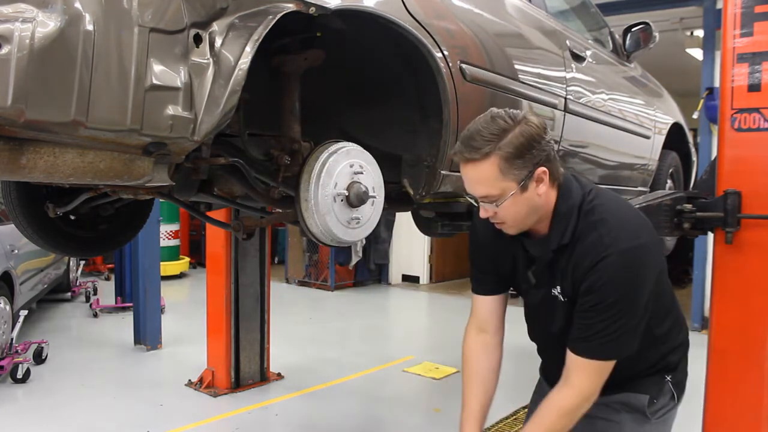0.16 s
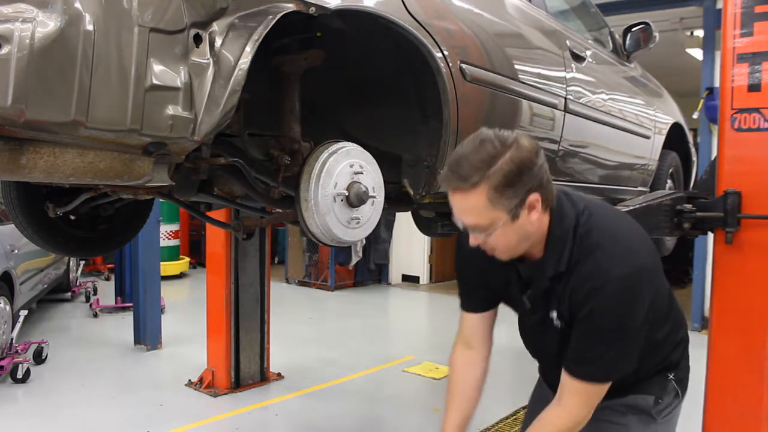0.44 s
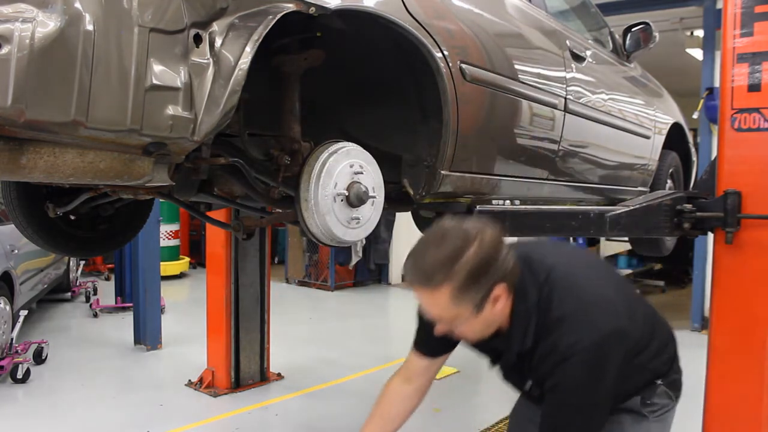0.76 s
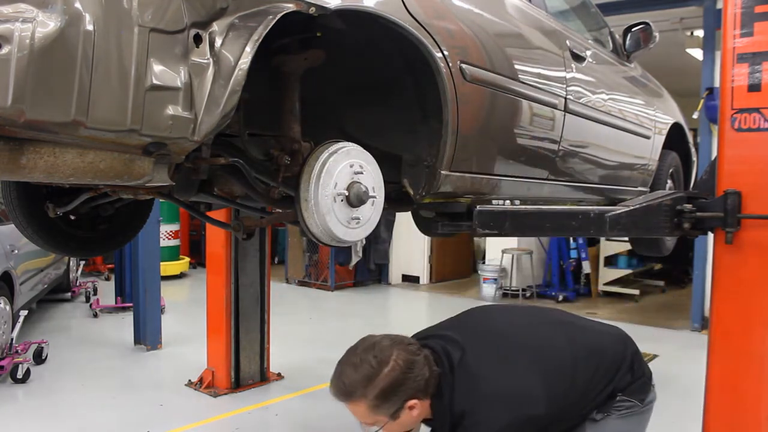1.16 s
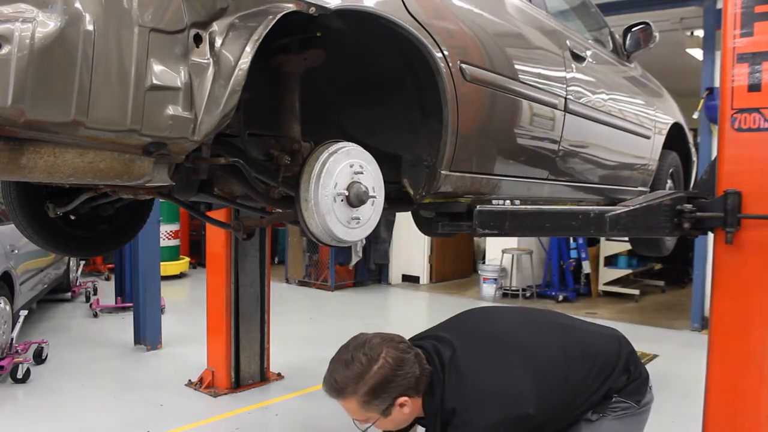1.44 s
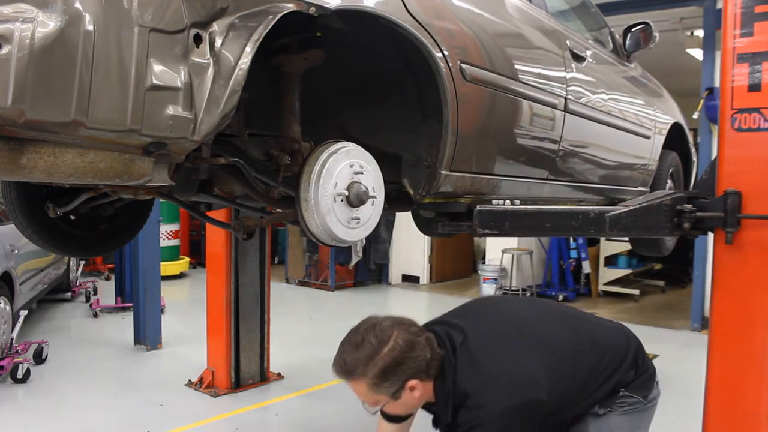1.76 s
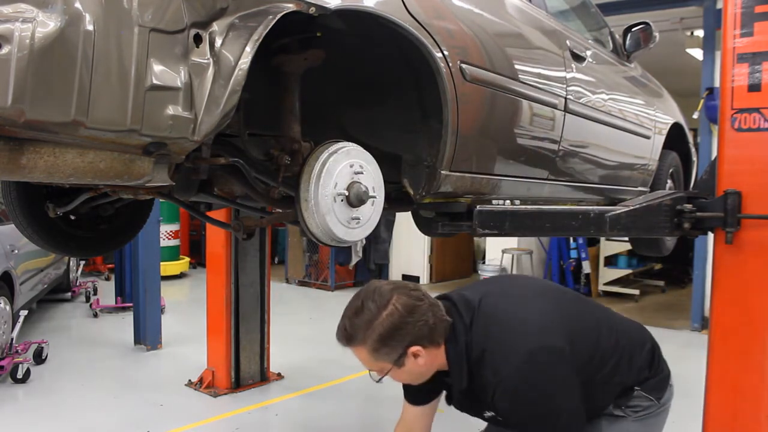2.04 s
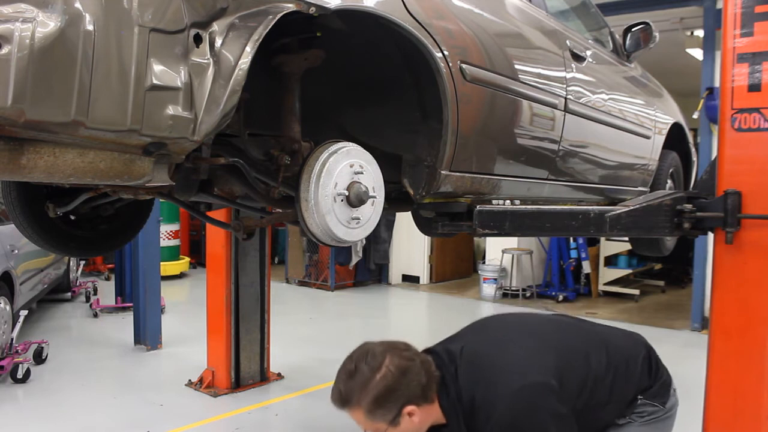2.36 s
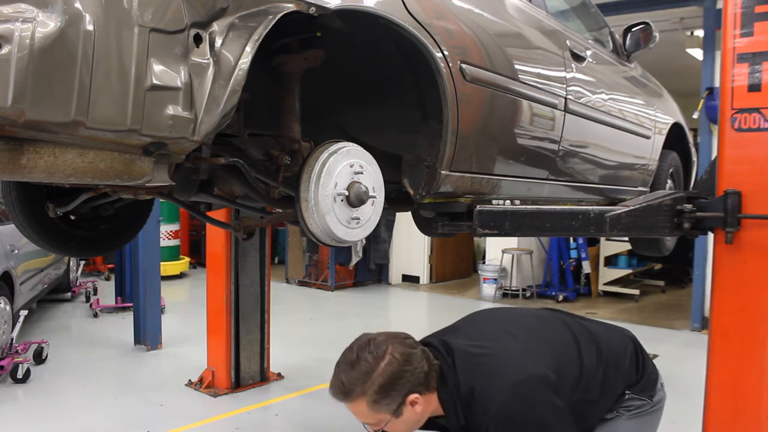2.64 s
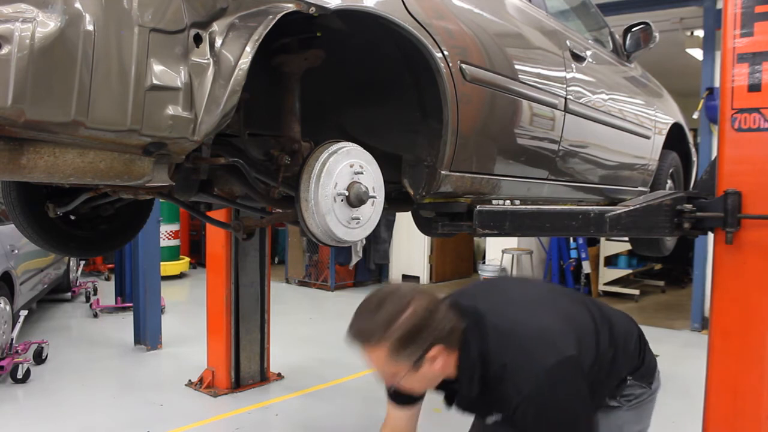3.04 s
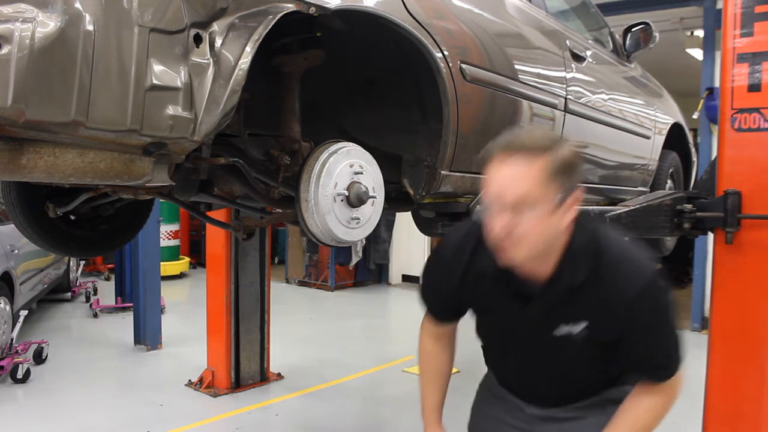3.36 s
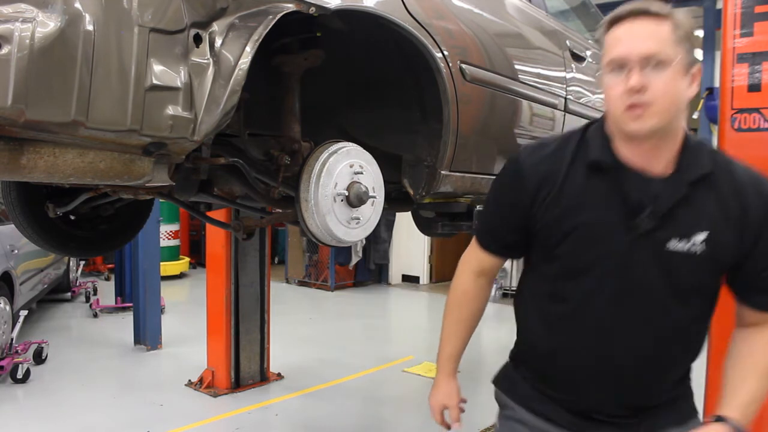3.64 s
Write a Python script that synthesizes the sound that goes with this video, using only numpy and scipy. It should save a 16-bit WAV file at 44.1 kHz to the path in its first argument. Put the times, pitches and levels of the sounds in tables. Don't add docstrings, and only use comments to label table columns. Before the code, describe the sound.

A heavy tyred steel wheel is handled on concrete over low fan hum and airy ventilation. Faint shoe and cloth scuffs and grit ticks lead to soft rolling knocks at 0.75-1.5 s, then firmer rubbery clunks at 1.55-1.9 s. A faint knock comes at 2.4 s. At 2.8 s it slams flat, by far loudest, bouncing at 2.9 and 3.03 s, settling by 3.3 s with sparse room echoes.

```python
import sys
import numpy as np
from scipy import signal
from scipy.fft import rfft, irfft
from scipy.io import wavfile
from scipy.ndimage import uniform_filter1d

SR = 44100
rng = np.random.default_rng(int(sys.argv[2]) if len(sys.argv) > 2 else 0)


def bounce(signal):
    frames = np.transpose(np.atleast_2d(signal))
    limited = np.clip(frames, -1, 1)
    pcm = np.round(limited * 32767).astype(np.int16)
    wavfile.write(sys.argv[1], SR, pcm)


def convert_level_to_amplitude(level_db):
    exponent = np.asarray(level_db, float) / 20
    return 10 ** exponent


N = 167580

# pitch_hz, level_db, t60_s
CLANK = [(583.5, -9, 0.038), (1200, -11.5, 0.029), (1319.6, -10.5, 0.024), (1530, -22.5, 0.035)]
THUD_RISE_S = 0.0015


def read(points, hz):
    point_hz, value = np.transpose(points)
    return np.interp(np.log(hz + 1), np.log(point_hz + 1), value)


def evened(x):
    return x / np.sqrt(np.mean(x ** 2) + 1e-20)


def add(mix, start_s, sound):
    at = round(start_s * SR)
    sound = sound[max(-at, 0):]
    part = mix[max(at, 0):][:len(sound)]
    part += sound[:len(part)]


def noise(size, colour_db):
    hz = np.fft.rfftfreq(size, 1 / SR) + 1
    spectrum = rfft(rng.standard_normal(size)) * convert_level_to_amplitude(colour_db(hz))
    return evened(irfft(spectrum, size))


def band(x, order, edge_hz, kind):
    return signal.sosfilt(signal.butter(order, edge_hz, kind, fs=SR, output="sos"), x)


def ring(t, hz, db, t60_s, rise_s):
    return convert_level_to_amplitude(db - 60 * t / t60_s) * (1 - np.exp(-t / rise_s)) * np.sin(2 * np.pi * hz * t)


def air():
    # freq_hz, level_db per Hz
    wash_colour = [(35, -14), (70, -2), (130, 0), (300, -8), (640, -15), (2200, -28), (4000, -26.5),
                   (15500, -45.5)]
    # pitch_hz, width_hz, level_db
    fan_tones = [(80, 14, -75), (120, 5.8, -71.5), (292, 19, -71.5), (360.1, 1.7, -66), (392.2, 2, -66)]
    wash_db, patchy_db = -59.5, 1.1
    frames, bin_hz = N // 256 + 5, np.fft.rfftfreq(1024, 1 / SR)
    real, imag, patches = rng.standard_normal((frames, 513, 3)).T
    patches = uniform_filter1d(patches, 14, axis=0)
    patches = evened(uniform_filter1d(patches, 16, axis=1))
    level_db = read(wash_colour, bin_hz)[:, None] + patchy_db * patches
    wash = signal.istft((real + 1j * imag) * convert_level_to_amplitude(level_db), nperseg=1024, noverlap=768)[1][:N]
    out = convert_level_to_amplitude(wash_db) * evened(wash)
    for hz, width_hz, db in fan_tones:
        out += convert_level_to_amplitude(db) * noise(N, lambda f: -20 * np.log10(1 + (2 * (f - hz) / width_hz) ** 2))
    return out


def scuff(start_s, length_s, db, hz, octaves, grain_db=1.5):
    cloth_dull_db = 0.5
    size = round(length_s * SR)
    swell = np.sin(np.pi * np.arange(size) / size) ** 0.5
    grain = evened(uniform_filter1d(rng.standard_normal(SR // 2), 120))[:size]

    def colour_db(f):
        hump = np.maximum(-6 * (np.log2(f / hz) / octaves) ** 2, -40)
        return hump - cloth_dull_db * np.log2(1 + (f / 9000) ** 4)

    hiss = noise(SR // 2, colour_db)[:size]
    snaps = 60. * (rng.random(SR // 2) < 120 / SR)
    snaps = 1 + uniform_filter1d(snaps, 60)[:size]
    return start_s, convert_level_to_amplitude(db) * swell * convert_level_to_amplitude(grain_db * grain) * snaps * hiss


def tick(start_s, db, hz, octaves, t60_s):
    t = np.arange(SR // 20) / SR
    kicks = convert_level_to_amplitude(-60 * t / t60_s) * rng.standard_normal(len(t)) * 0.41
    kicks[0] = 3
    edges_hz = np.clip([hz * 2 ** -octaves, hz * 2 ** octaves], 50, 15000)
    snap = band(kicks, 2, edges_hz, "band")
    return start_s, convert_level_to_amplitude(db) * snap / abs(snap).max()


def wheel(t, spread_db=3.0):
    # pitch_hz, level_db, t60_s
    rings = [(243.5, -13, 0.26), (271.6, 3, 0.11), (325, -8.5, .16), (430, -11.5, 0.16), (616, -16, 0.08),
             (932, -16, 0.072), (1057, -14.5, 0.33), (1023, -22, 0.3)]
    luck = rng.standard_normal(len(rings))
    return sum(ring(t, hz, db + spread_db * u, t60_s, 0.004) for (hz, db, t60_s), u in zip(rings, luck))


def knock(start_s, db, thud_hz, crack_db, ring_db):
    # freq_hz, level_db per Hz
    crack_colour = [(1500, -3), (2000, -2), (3000, -0.5), (4500, -6.5), (8000, -13), (15500, -32.5)]
    thud_t60_s, crack_t60_s = 0.023, 0.03
    rebound_s, rebound_db, rebound_pitch = 0.00907, -8, 0.67
    dull_db = 0.5
    t = np.arange(SR // 2) / SR
    luck = rng.standard_normal((len(CLANK), 2))

    out = -ring(t, thud_hz, 7.67, thud_t60_s, THUD_RISE_S)
    rebound = ring(t, rebound_pitch * thud_hz, 12 + rebound_db, 0.79 * thud_t60_s, THUD_RISE_S)
    add(out, rebound_s, rebound)
    for (hz, mode_db, t60_s), (u, v) in zip(CLANK, luck):
        out += ring(t, hz * (1 + 0.042 * u), mode_db + 7 + 2 * v, t60_s, 0.0017)

    def colour_db(hz):
        softness = dull_db * abs(db) * np.log2(np.minimum(3800 / hz, 1))
        return read(crack_colour, hz) - 40 * (hz < 1500) + softness

    crack = noise(len(t), colour_db) * (1 - np.exp(-t / 0.0013))
    out += crack * (convert_level_to_amplitude(crack_db - 0.5 - 60 * t / crack_t60_s) + convert_level_to_amplitude(crack_db - 9 - 60 * t / 0.14))
    body = noise(len(t), lambda hz: -16 * np.log2(hz / 380) ** 2) * (1 - np.exp(-t / 0.0017))
    out += body * (convert_level_to_amplitude(-0.5 - 60 * t / 0.017) + convert_level_to_amplitude(-14 - 60 * t / 0.19))
    out = band(out, 2, 170, "high")
    return start_s, convert_level_to_amplitude(db) * (out + convert_level_to_amplitude(ring_db) * wheel(t))


def slide(start_s, length_s, db, grit_db, dull_db):
    # freq_hz, level_db per Hz
    grit_colour = [(590, -42), (1000, -0.5), (2180, -16.5), (3110, -11), (6710, -20.5), (15500, -43.5)]
    t = np.arange(SR // 2) / SR
    push = np.sin(np.pi * np.clip(t / length_s, 0, 1) ** 0.96) ** 2
    slips = push * rng.standard_normal(len(t)) * (rng.random(len(t)) < 900 / SR)

    body = ring(t, 306.5, 0, 0.056, THUD_RISE_S) + ring(t, 467, -1, 0.049, THUD_RISE_S)
    body += convert_level_to_amplitude(-7.5) * wheel(t)
    body += sum(ring(t, hz, mode_db + 6, t60_s, 0.00093) for hz, mode_db, t60_s in CLANK)
    thud = signal.fftconvolve(slips, body)[:len(t)]
    thud_rms = np.sqrt(np.mean(thud[:round(length_s * SR)] ** 2))

    def colour_db(hz):
        return read(grit_colour, hz) - 30 * (hz < 900) - dull_db * np.log2(hz / 3000)

    grit = noise(len(t), colour_db) * push
    grit *= convert_level_to_amplitude(2 * evened(uniform_filter1d(rng.standard_normal(len(t)), 90)))
    return start_s, convert_level_to_amplitude(db) * (thud / thud_rms + convert_level_to_amplitude(grit_db) * grit)


def thump(start_s, db, hz, t60_s):
    return start_s, ring(np.arange(SR // 2) / SR, hz, db, t60_s, 0.005)


def shop(x):
    # freq_hz, t60_s
    decay = [(100, 2.3), (400, 0.75), (1500, 1.68), (5000, 1.58), (12000, 1.2)]
    echo_gap_s = 0.012
    taps = np.zeros(SR)
    at = np.arange(round(echo_gap_s * SR), SR - 20, 20)
    at = at + rng.integers(0, 20, len(at))
    taps[at] = rng.choice([-1., 1.], len(at))
    hz, t, z = signal.stft(taps, SR, nperseg=512)
    fade = convert_level_to_amplitude(-60 * t / read(decay, hz)[:, None])
    tail = signal.istft(z * fade, SR, nperseg=512)[1]
    return signal.fftconvolve(x, tail / np.linalg.norm(tail))[:N]


def scene():
    # start_s, length_s, level_db, centre_hz, width_octaves
    scuffs = [(-.05, .15, -62.5, 5600, 0.47), (-.05, 0.16, -64.5, 1200, 0.9),
              (0.141, 0.12, -68.5, 4340, 0.81), (0.162, 0.087, -60.5, 1300, 0.97),
              (0.616, 0.18, -74, 7750, 0.3), (0.616, 0.18, -65.5, 770, 0.59), (2.401, 0.23, -70, 875, 1.2),
              (0.746, 0.19, -61, 4170, 0.92), (0.761, 0.14, -60.5, 850, 0.74),
              (1.067, 0.091, -64.5, 4250, 0.85), (0.976, 0.088, -64.5, 2960, 0.94),
              (1.122, 0.11, -73, 8900, 0.3), (0.252, 0.18, -77, 3500, 0.95),
              (1.211, .28, -68.5, 6200, 0.75), (1.485, 0.21, -72.5, 6900, 0.51),
              (1.723, 0.026, -58, 5600, 0.22), (1.905, 0.28, -66, 4170, 0.8),
              (2.313, 0.069, -66, 5900, 0.71), (2.321, 0.057, -63, 1320, 0.48),
              (3.092, 0.18, -69, 4270, 0.94)]
    # start_s, level_db, centre_hz, width_octaves, t60_s
    ticks = [(.394, -34, 4650, 0.46, 0.0068), (.395, -47, 1450, 0.58, 0.0025),
             (.89, -50, 6000, 0.74, 0.017), (1.423, -46, 2970, 0.29, .02), (.779, -46.5, 2500, 0.59, 0.01),
             (0.844, -49, 5000, 1.1, .015), (0.865, -41.5, 7700, 0.57, 0.022),
             (1.08, -41.5, 6400, 0.37, 0.081), (1.288, -36.5, 2644, 0.41, 0.037),
             (1.702, -48.5, 4740, 0.55, 0.017), (1.735, -38, 5100, 0.34, 0.049),
             (1.956, -46, 4000, 0.51, .008), (2.423, -40.5, 1200, 0.59, 0.032),
             (2.494, -49, 8300, 0.37, 0.017), (3.14, -45, 4500, 0.61, .04)]
    # start_s, level_db, thud_hz, crack_db, ring_db
    knocks = [(.753, -48, 504, -21, -4), (1.085, -46, 473, -8.5, -8), (1.316, -43, 294, -16, 1),
              (1.355, -41.5, 520, -17, -20), (2.422, -42.5, 300, -22, -9), (1.422, -45.5, 587, -9.5, -19),
              (1.506, -49.5, 390, -8.5, 5.5), (1.545, -37, 440, -14, 3.5), (1.622, -27, 430, -18, -9.5),
              (1.724, -34.5, 430, -14, -21), (1.787, -28, 477, -14.5, -7.5), (1.854, -38, 417, -11, -1),
              (1.900, -38.5, 396.5, -17, -13), (2.796, -8, 444, -17.5, -28), (2.883, -30, 307, -11, -8.5),
              (2.921, -19.5, 430, -12.5, -5), (3.034, -24, 406, -9.5, -8.5),
              (3.134, -39.5, 328, -15.5, -19), (3.176, -38.5, 380, -11, -3), (3.275, -51.5, 373, 6.5, -2.5)]
    # start_s, length_s, level_db, grit_db, dullness_db per octave
    slides = [
        (0.931, 0.06, -35.5, -4.5, -1.5),
        (1.27, 0.051, -39, -9.5, 5),
        (2.75, 0.15, -53.5, 3, 5),
    ]
    # start_s, level_db, pitch_hz, t60_s
    thumps = [
        (0.954, -44.5, 102, 0.46),
        (2.371, -49.5, 80, .4),
        (2.798, -28.5, 98, 0.35),
        (2.921, -30, 100, 0.22),
        (3.034, -36, 97, 0.17),
        (3.231, -38, 92.3, 0.13),
    ]
    shop_db = -10.5
    near = np.zeros(N)
    for source, table in ((scuff, scuffs), (tick, ticks), (knock, knocks), (slide, slides), (thump, thumps)):
        for row in table:
            add(near, *source(*row))
    return (near + convert_level_to_amplitude(shop_db) * shop(near) + air())[None]


def roll_off(x):
    return signal.sosfilt(signal.butter(12, 16430, fs=SR, output="sos"), x)


def record(dry):
    edge_hz = 15800
    cut = band(dry, 4, 62, "high")
    low_pass = signal.firwin(511, edge_hz, window=("kaiser", 9), fs=SR)
    mix = signal.oaconvolve(cut, low_pass[None], "same")
    return roll_off(mix)


dry = scene()
out = record(dry)
bounce(out)
```